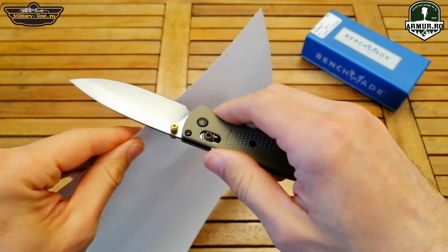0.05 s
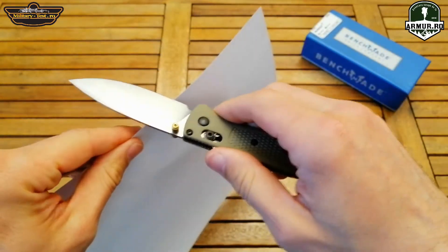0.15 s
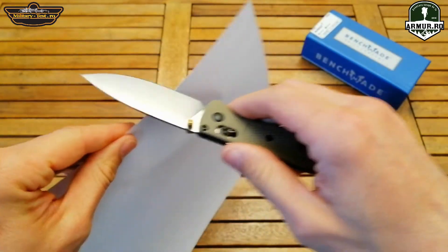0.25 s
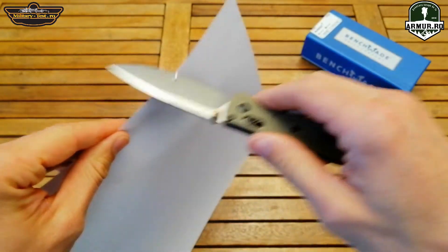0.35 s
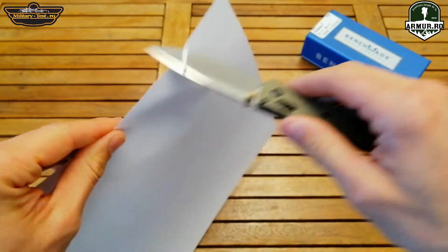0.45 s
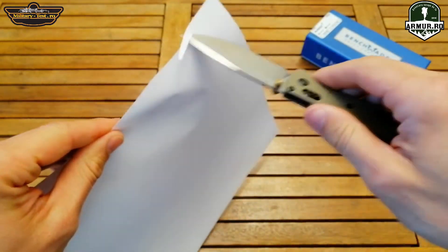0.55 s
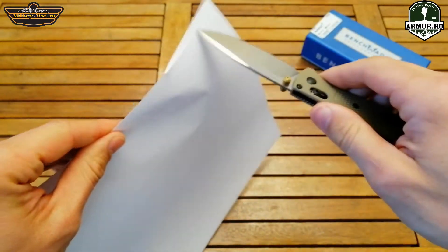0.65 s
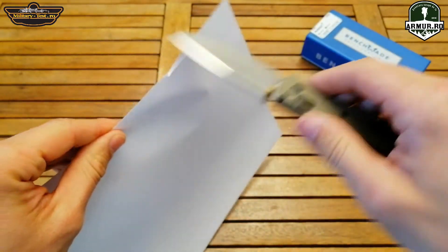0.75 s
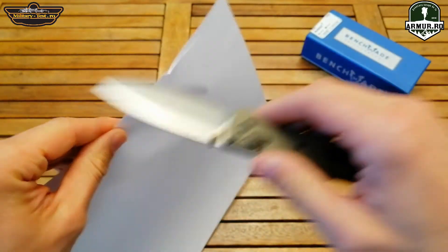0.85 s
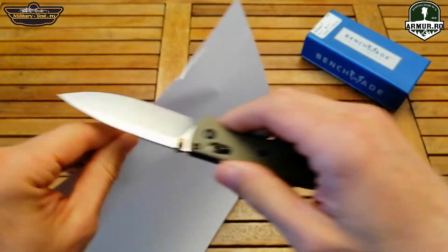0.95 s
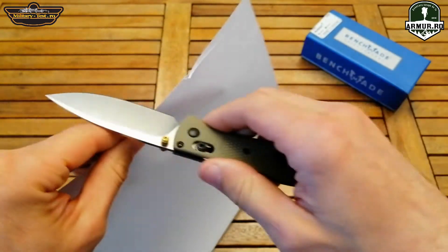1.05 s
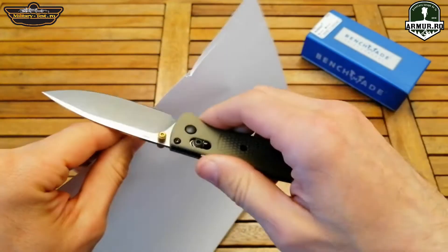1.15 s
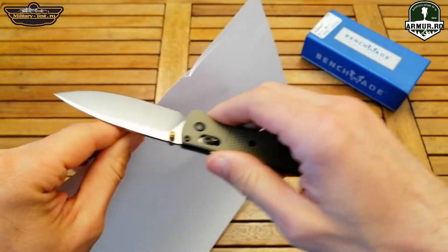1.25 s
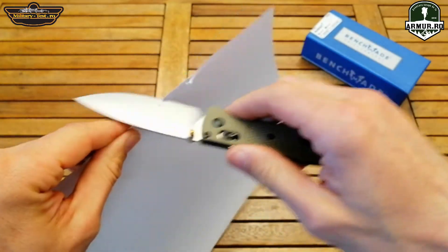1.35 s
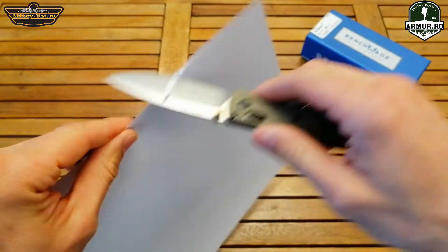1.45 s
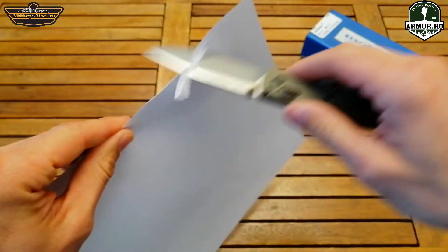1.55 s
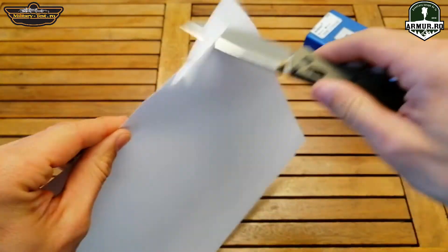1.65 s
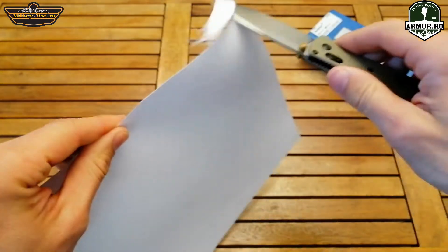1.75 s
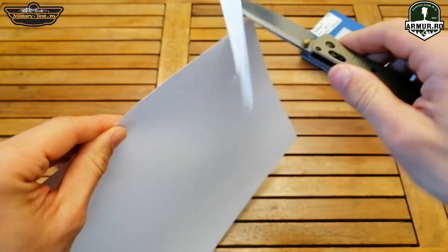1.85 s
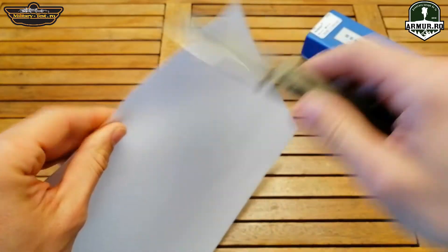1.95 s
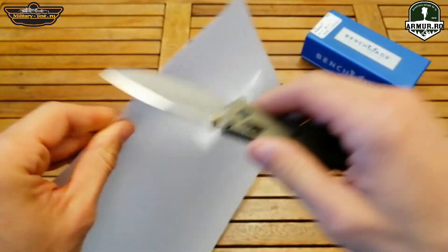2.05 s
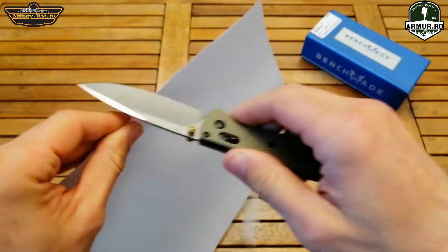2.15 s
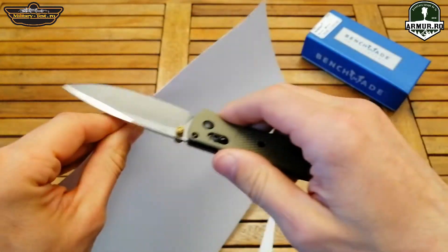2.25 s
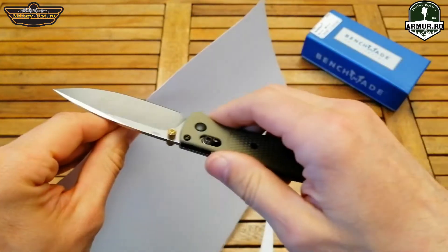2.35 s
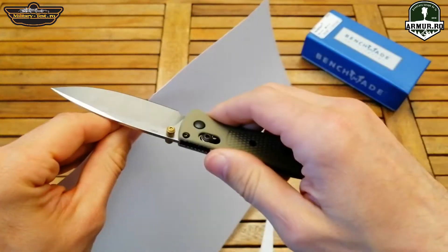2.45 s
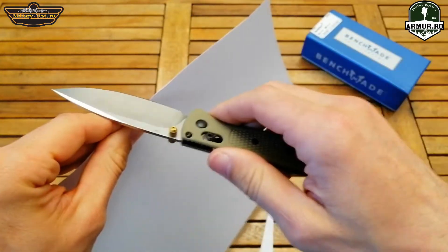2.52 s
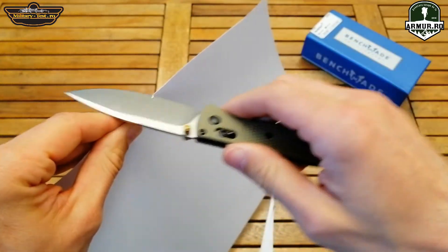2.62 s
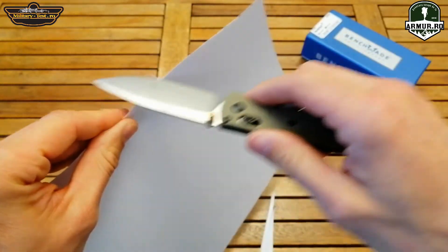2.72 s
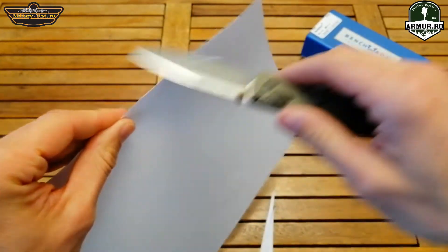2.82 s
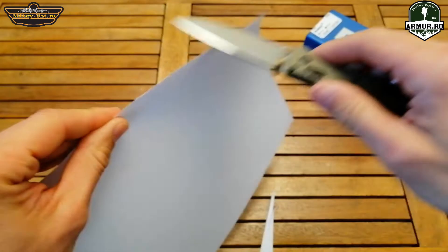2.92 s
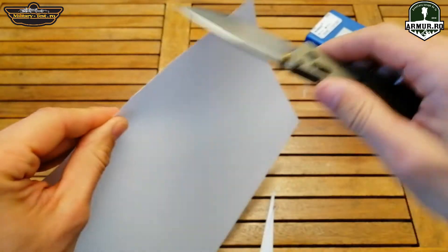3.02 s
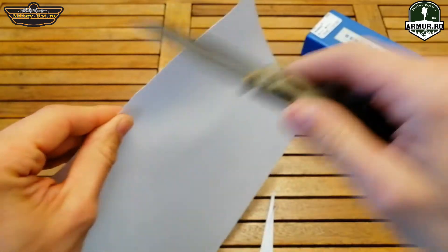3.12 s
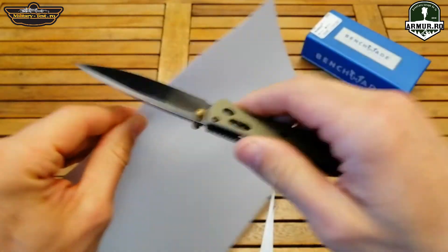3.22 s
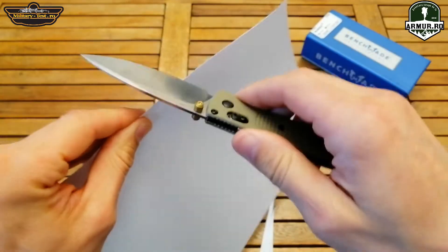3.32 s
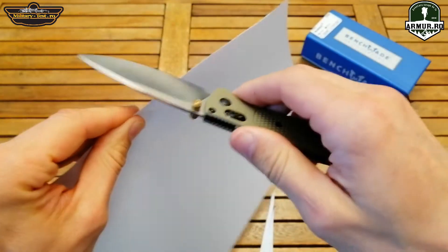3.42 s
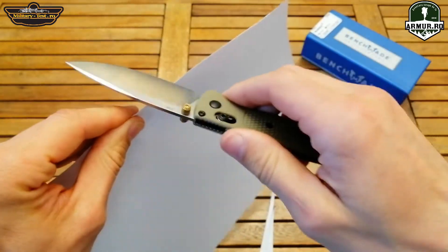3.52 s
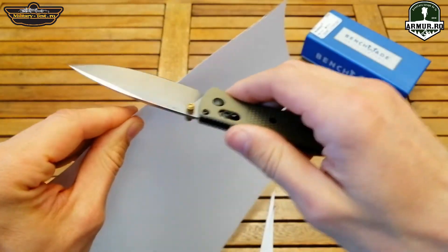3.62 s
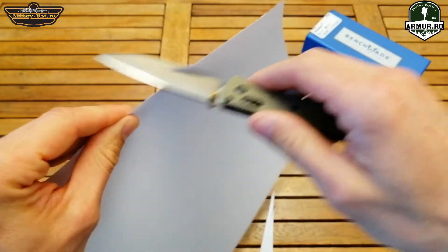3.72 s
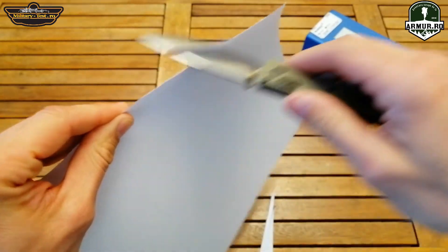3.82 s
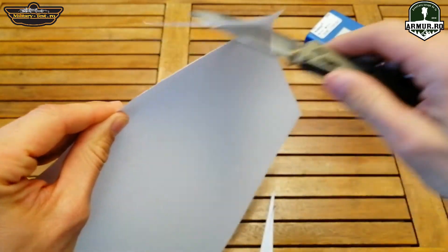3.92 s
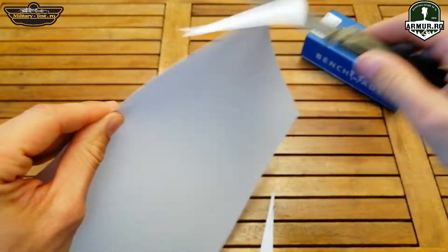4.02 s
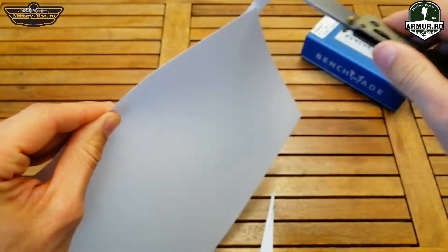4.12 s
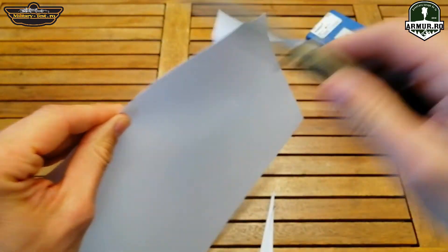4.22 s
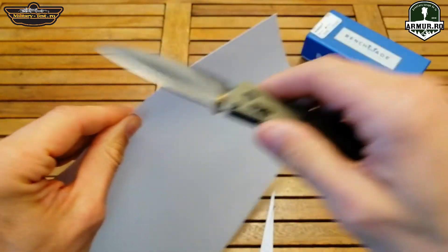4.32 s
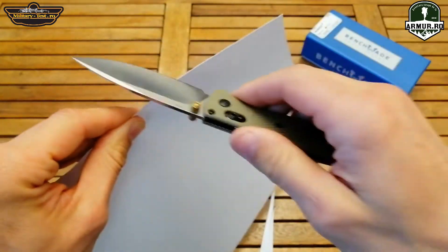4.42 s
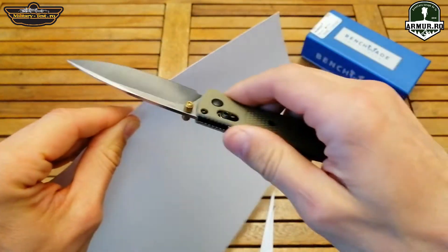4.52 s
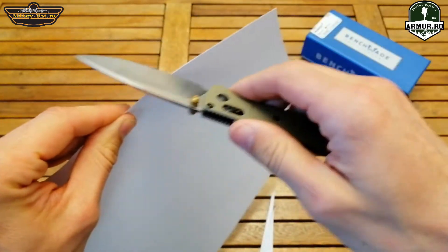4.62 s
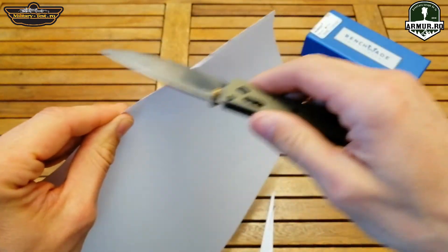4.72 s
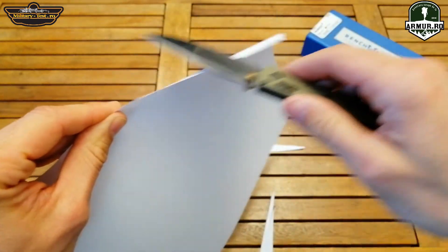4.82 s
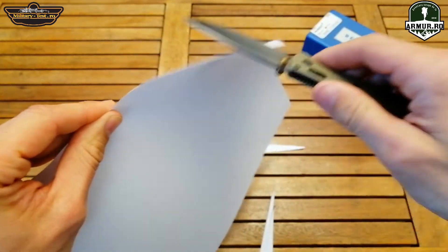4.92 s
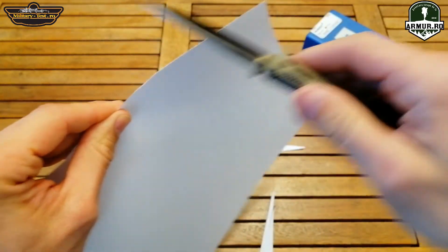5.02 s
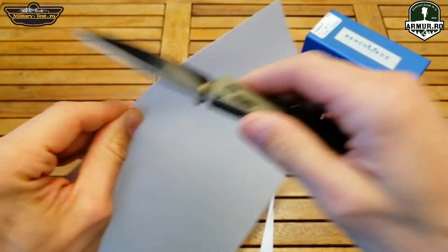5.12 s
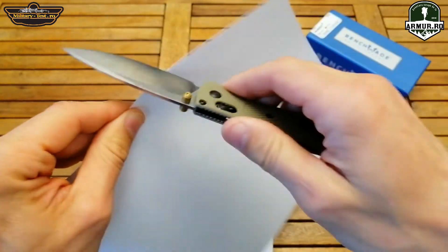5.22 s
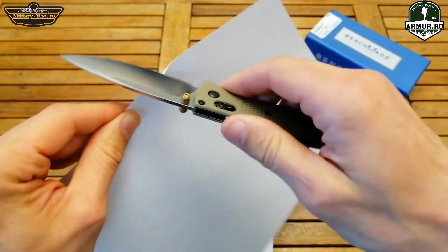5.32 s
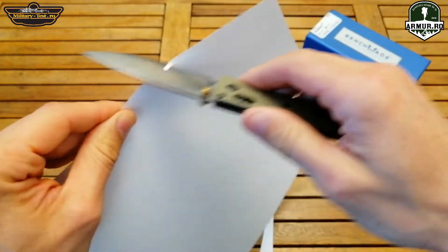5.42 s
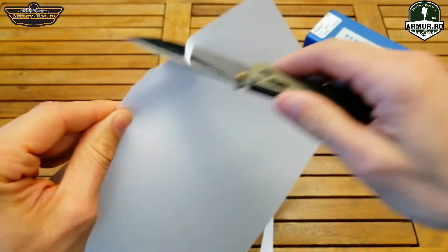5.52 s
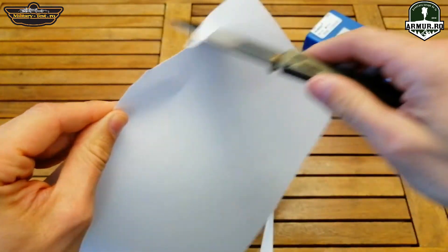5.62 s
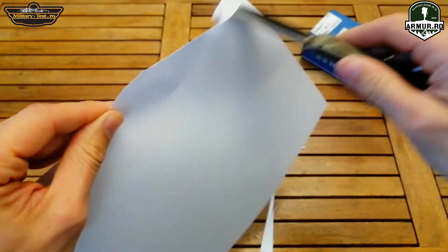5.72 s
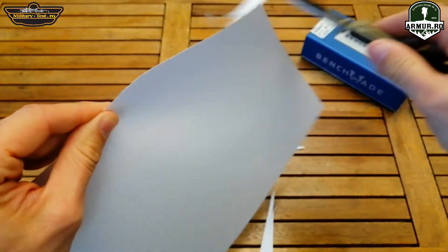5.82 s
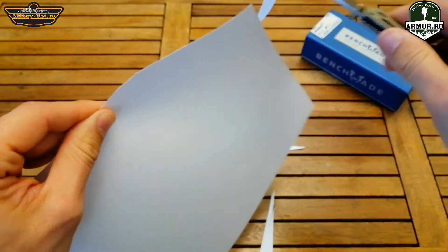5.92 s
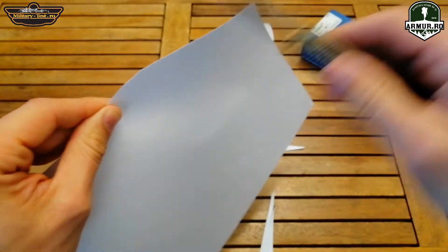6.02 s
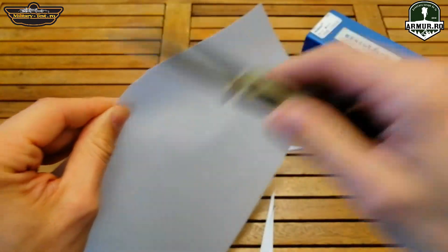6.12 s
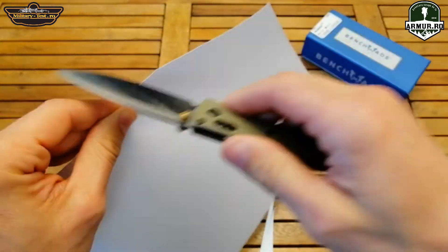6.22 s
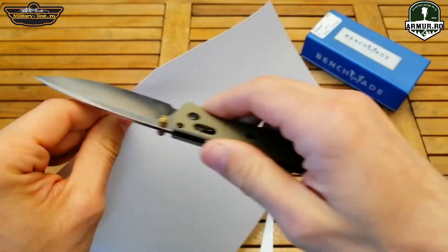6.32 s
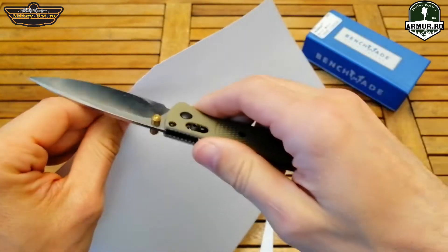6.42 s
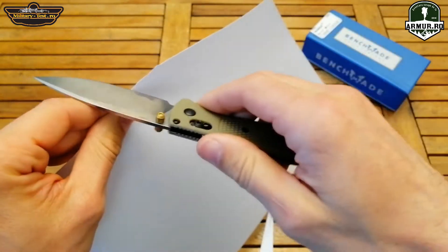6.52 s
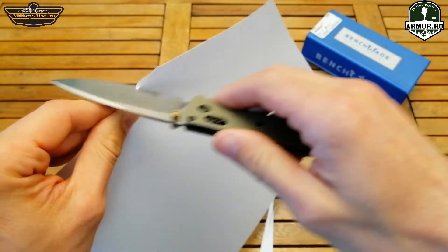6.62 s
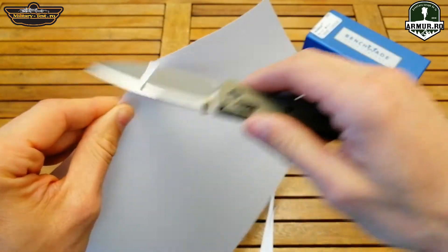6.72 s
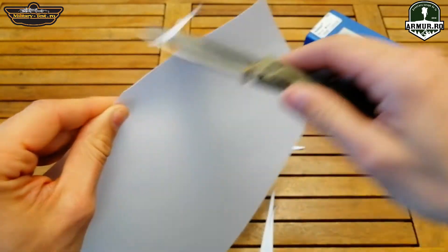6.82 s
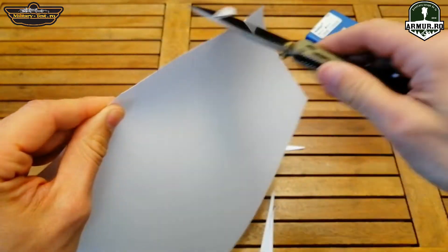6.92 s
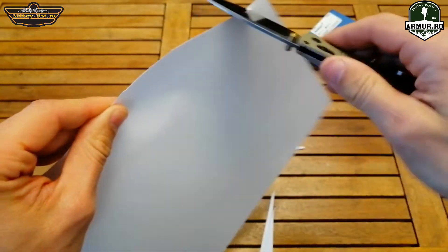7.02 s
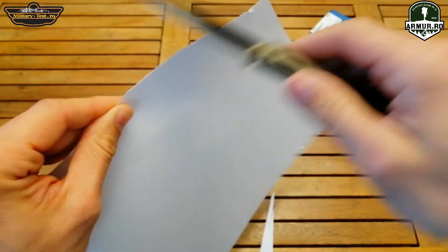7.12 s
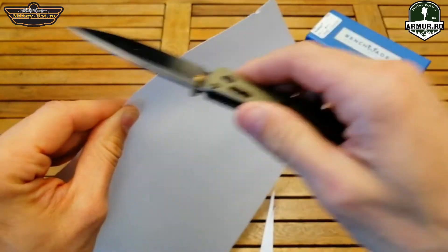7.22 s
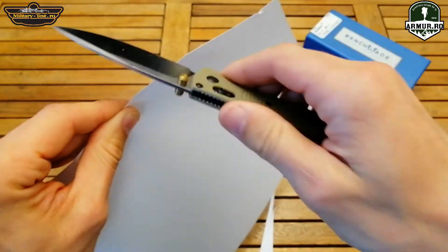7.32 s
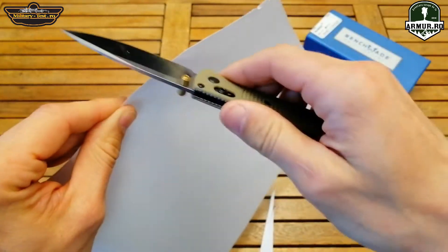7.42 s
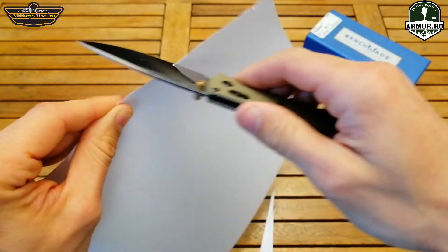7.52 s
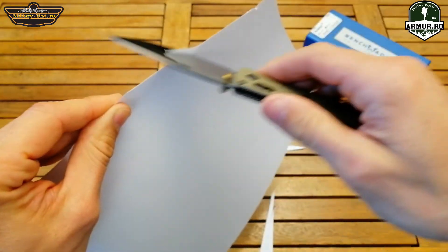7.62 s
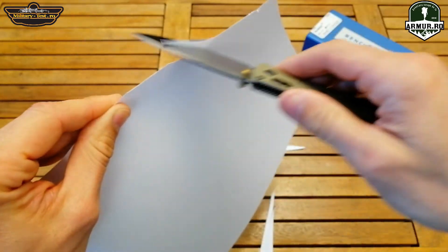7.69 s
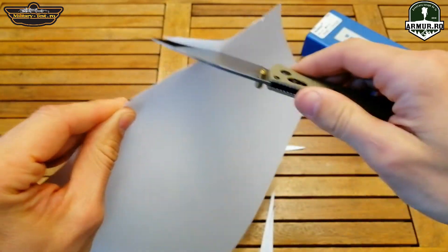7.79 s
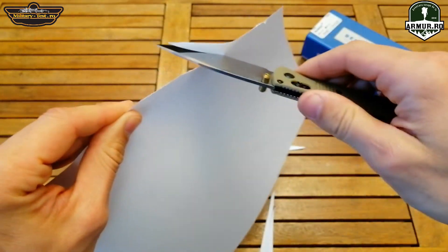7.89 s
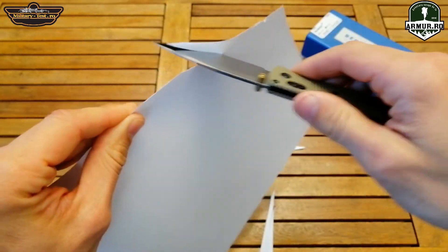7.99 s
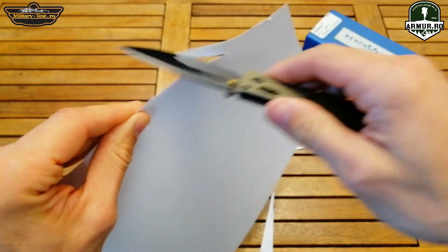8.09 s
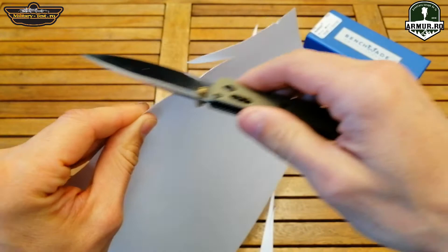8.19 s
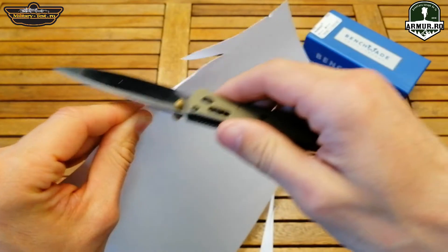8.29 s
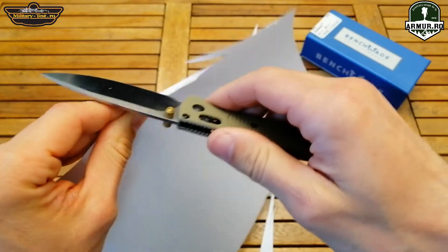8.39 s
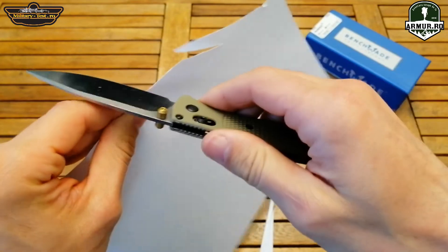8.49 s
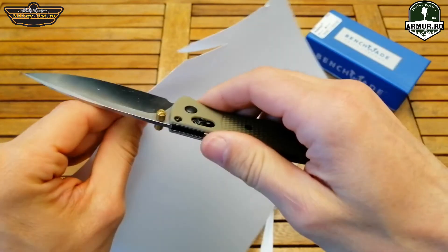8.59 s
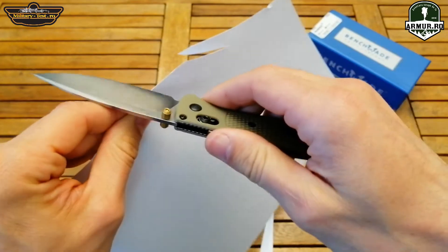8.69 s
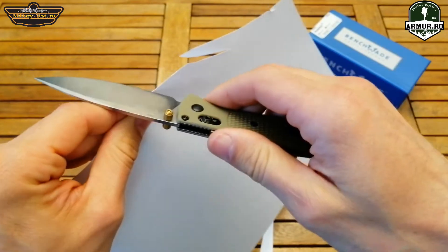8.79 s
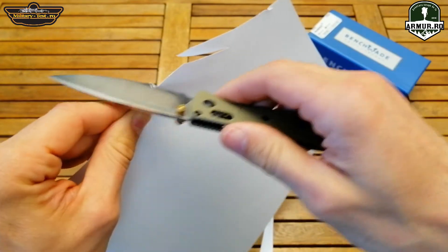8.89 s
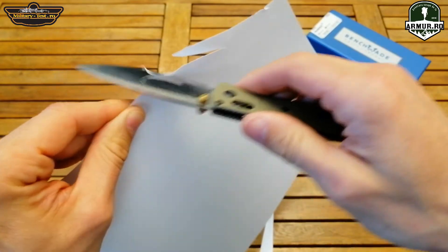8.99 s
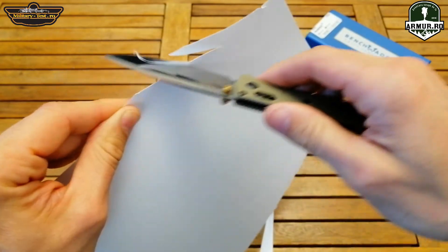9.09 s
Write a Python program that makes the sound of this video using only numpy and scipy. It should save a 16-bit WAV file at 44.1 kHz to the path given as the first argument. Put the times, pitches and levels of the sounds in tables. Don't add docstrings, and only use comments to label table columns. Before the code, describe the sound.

A sharp blade slices a hand-held paper sheet in short crisp rasping strokes, with ticks and soft flaps between, close up in a quiet small room.

```python
import sys
import numpy as np
from scipy import signal
from scipy.fft import rfft, irfft, next_fast_len
from scipy.io import wavfile
from scipy.ndimage import uniform_filter1d, map_coordinates

SR = 44100
rng = np.random.default_rng(int(sys.argv[2]) if len(sys.argv) > 2 else 0)


def inscribe(sig):
    pcm = np.round(np.clip(np.atleast_2d(sig).T, -1, 1) * 32767)
    wavfile.write(sys.argv[1], SR, pcm.astype(np.int16))


def volts(x):
    e = np.asarray(x, float) / 20
    return 10 ** e


N = 403515
HZ = np.fft.rfftfreq(next_fast_len(N), 1 / SR)
# [f/Hz, share 0-1]
SHEET_LIKENESS = [(100, 0.98), (700, 0.97), (1500, 0.85), (2500, 0.69), (3100, 0.44), (3700, 0.21),
                  (6000, 0.31), (12000, 0.31)]


def strokes():
    # [t/s, f/Hz]
    song_hz = [(0.3, 6140), (0.72, 6580), (1.21, 5910), (1.38, 6950), (1.73, 5830), (1.9, 6700),
               (2.37, 5570), (2.42, 6110), (4.56, 6540), (4.86, 5620), (4.93, 6610), (6.19, 6530),
               (6.26, 6960), (6.86, 5730), (6.93, 6860), (7.77, 6320), (8.65, 6920), (9.15, 5760)]
    # [pressure/(dB/dB), keenness/(dB/dB), slack/(dB/dB), offset/dB]
    body_law = (0.99, 0.011, 0.87, 0.11)
    mid_law = (0.99, 0.13, 0.23, -2.24)
    hiss_law = (1.036, 0.66, 0.022, 0.6)
    song_law = (1.12, -0.56, 0.13, -5)
    fizz_law = (1.014, 1.45, 0.022, 0.088)
    top_law = (1.22, 1.23, -0.27, -4)
    song_width_hz, song_left_db = 620, -18.5
    shrink_db_per_s = -0.3266
    t = np.arange(N) / SR

    snaps = mottled(fibres(30000, 1.0), 2.4, hz_bins=3, frames=10)
    snaps = mottled(snaps, 1.1, hz_bins=9, frames=16)
    snaps -= 0.24 * resonate(snaps, 3630 + 94 * t, 440)
    snaps += 1.9 * volts(-0.62 * t) * resonate(snaps, 4805 + 86 * t, 420)

    body, mid, hiss, fizz, top = sheet_bands(paired(*snaps, SHEET_LIKENESS))
    song = resonate(hiss, np.interp(t, *np.transpose(song_hz)), song_width_hz)
    song = evened(song * volts(np.array([[song_left_db], [0]])))
    mid = mid * volts(shrink_db_per_s * t)

    bands = (body, mid, hiss, song, fizz, top)
    laws = (body_law, mid_law, hiss_law, song_law, fizz_law, top_law)
    blade = contacts()
    out = np.zeros((2, N))
    for band, (*shares, offset_db) in zip(bands, laws):
        out += band * envelope(blade, lambda r: r[:, 1:] @ shares + offset_db)
    judder = evened(uniform_filter1d(rng.standard_normal(N), size=300))
    return out * volts(0.45 * judder)


def contacts():
    # [t/s, edge pressure/dB, bite keenness/dB, sheet slack/dB]
    slices = [
        [(0.3, -61, -11, 8), (0.32, -49.5, -4.5, -4), (0.46, -37, -2.5, -8), (0.572, -40, 2, -11),
         (0.716, -39, -3, -10), (0.74, -47.5, -8, -14)],
        [(1.4, -64, -15, 14), (1.415, -48, -8.5, -17), (1.442, -46.5, -3.5, -23), (1.458, -44.5, -4.5, 0),
         (1.53, -41.5, -7.5, -15), (1.596, -37, -2.5, -13.5), (1.69, -31.5, -7.5, -18.5),
         (1.772, -29.5, -14.5, -18.5), (1.83, -30.5, -12, -15.5), (1.893, -35, -7, -16.5)],
        [(3.695, -74.5, 1, 11), (3.738, -64.5, 2, -4), (3.75, -53.5, 0.5, 0.5), (3.867, -35.5, -2.5, -9),
         (3.969, -29.5, -12, -18), (4.025, -30.5, -8.5, -10.5), (4.117, -29, -11, -10)],
        [(5.5, -57, 6.5, -11), (5.517, -41.5, -3.5, 1.5), (5.635, -42.5, 5.5, -12.5), (5.681, -39, -0.5, -3),
         (5.75, -39, -3, -9), (5.795, -32, -11, -13.5), (5.86, -34, -8, -13), (5.912, -35, -2, -8.5)],
        [(7.61, -54.5, 2.5, -6), (7.638, -46, -4.5, -2), (7.656, -42.5, 0.5, -1.5), (7.698, -38, 0, -8),
         (7.75, -33.5, -8, -12.5), (7.82, -33.5, -10, -12), (7.889, -33, -7.5, -7)],
    ]
    # [t/s, pressure/dB, keenness/dB, slack/dB]
    nicks = [
        [(2.68, -77, 2, 0), (2.72, -54.5, -1.5, -4.5), (2.794, -45, -3.5, -2), (2.924, -40, -5.5, -11.5),
         (2.972, -35, -9, -19)],
        [(2.98, -52, -9, -1), (3.016, -55.5, -6.5, -1.5), (3.076, -48, -15, -5), (3.092, -51, -6, -4),
         (3.1, -38.5, -13, -6), (3.125, -39.5, -9.5, -7), (3.15, -53, -6, -5)],
        [(4.79, -75.5, -4, 18), (4.83, -54.5, 1, 3), (4.876, -45, -2.5, 2.5), (5.012, -48, -13, -14.5),
         (5.11, -57.5, -4, -13.5)],
        [(6.73, -62, -6.5, 2), (6.751, -43.5, -6, -6.5), (6.807, -42.5, 1, -9.5), (6.917, -39.5, 1.5, -10),
         (6.94, -38.5, -9.5, -16)],
        [(6.945, -47.5, -9, -6), (6.997, -54.5, -0.5, 10.5), (7.031, -32.5, -19, -12.5),
         (7.06, -34.5, -12, -2.5), (7.087, -32.5, -10.5, -10), (7.12, -38.5, -6.5, -14)],
        [(8.96, -63, -5.5, 1), (8.972, -58, -3.5, 4), (9.03, -42.5, -5.5, -7.5), (9.118, -40, -2.5, -3.5),
         (9.15, -37, -4, -18)],
    ]
    # [t/s, pressure/dB, keenness/dB, slack/dB]
    drag = [
        (8.145, -69, -3, -1),
        (8.172, -48.5, -7.5, -12.5),
        (8.19, -61, -7.5, -37),
        (8.336, -65, 0, -41),
        (8.402, -57, -7, -4.5),
        (8.45, -56, -5, -10),
        (8.51, -59.5, -4, -5.5),
        (8.562, -72, -1, 0),
    ]
    # [start/s, rise/s, fall/s, pressure/dB, slack/dB]
    brushes = [
        (0.119, 0.14, 0.022, -69.5, 5.5),
        (0.742, 0.021, 0.081, -48.5, -7.5),
        (0.825, 0.022, 0.03, -53, -32),
        (2.343, .003, 0.095, -55, -8),
        (5.43, 0.0027, 0.076, -54.5, -1),
        (5.918, 0.0027, 0.04, -43, 3.5),
        (5.99, 0.066, 0.052, -59.5, -16),
        (6.68, 0.011, 0.25, -56.5, -13),
        (8.562, 0.021, 0.066, -55.5, -5.5),
        (8.829, 0.05, 0.026, -55, 0.5),
    ]
    from_db, to_db, keen_db = -8.5, -26, -5
    rubs = []
    for s, rise_s, fall_s, db, slack in brushes:
        rubs.append([(s, db + from_db, keen_db, slack),
                     (s + rise_s, db, keen_db, slack),
                     (s + rise_s + fall_s, db + to_db, keen_db, slack)])
    cuts = [list(map(tuple, rows)) for rows in slices + nicks + [drag]]
    return sorted(cuts + rubs)


def fibres(per_s, spread_db):
    size_db = spread_db * np.minimum(rng.exponential(1, (2, N)), 4)
    size = volts(size_db) * rng.standard_normal((2, N))
    return size * (rng.random((2, N)) < per_s / SR)


def mottled(x, patchy_db, hz_bins, frames):
    z = signal.stft(x, nperseg=512)[2]
    patches = rng.standard_normal(z.T.shape).T
    patches = uniform_filter1d(uniform_filter1d(patches, hz_bins, 1), frames, 2)
    gain = volts(patchy_db * patches / patches.std())
    return signal.istft(z * gain, nperseg=512)[1][:, :N]


def sheet_bands(z):
    edges_hz = [490, 2200, 4400, 7600, 11000, 16000]
    # [f/Hz, density/dB]
    sheet_db = [(47, -50), (80, -27.5), (162, -5), (337, -9.5), (763, -5), (1240, -7), (1420, -9.5),
                (2470, -9), (3080, -9), (3750, -13.5), (6240, -12.5), (8510, -7.5), (12700, -17),
                (14800, -10.5), (15800, -32.5)]
    # [f/Hz, width/Hz, level/dB]
    rings = [(2800, 540, 2), (5340, 420, 5), (5950, 500, 3), (6990, 720, 6.5), (8250, 310, 4),
             (9970, 330, 5), (3930, 2900, -2.5), (2392, 520, -4)]
    # [f/Hz, left minus right/dB]
    ports_db = [(150, -2), (500, 4.5), (800, 2), (1300, -7.5), (1750, -7.5), (2400, 3.5), (3400, -1.5),
                (4500, -1.5), (5300, -2), (6000, -3.5), (6900, -1), (7600, -0.5), (8600, 13), (9700, 5),
                (11500, 0), (15000, -2.5)]
    db = read(sheet_db, HZ)
    for hz, width_hz, ring_db in rings:
        db = db + ring_db * np.exp(-2 * ((HZ - hz) / width_hz) ** 2)
    db = db + np.array([[0.5], [-0.5]]) * read(ports_db, HZ)
    slopes = (7, 16, 24, 24, 16, 24)
    above = [1 / (1 + (hz / (HZ + 1)) ** steep) for hz, steep in zip(edges_hz, slopes)]
    return [heard(z * np.sqrt(abs(lo - hi)), db) for lo, hi in zip(above, above[1:])]


def ticks():
    # [t/s, peak/dB, body/dB rel, mid/dB rel, echo/dB rel]
    hard = [(1.2223, -24.5, 0.5, -2.5, -7.5), (2.114, -33.5, -8, -12.5, -10.5), (2.3374, -26, -9, -10, -24),
            (2.8936, -36.5, 2, -1, -13), (3.063, -28.5, -20, -20, -14), (5.3853, -53.5, 13.5, -2.5, -13.5),
            (3.1004, -24.5, -21, -7, -24), (4.5095, -31.5, -22, -10, -1.5), (5.5143, -46, 6, 14, -1),
            (5.9203, -33.5, 6.5, -5, -6), (5.9389, -31.5, 1, 5, -4), (7.0435, -18, -34.5, -16, -15),
            (7.625, -46, -4, -26.5, -3)]
    # [t/s, peak/dB, body/dB rel, mid/dB rel, echo/dB rel]
    touches = [(0.2493, -55.5, -6, -9, 2.5), (0.308, -37.5, -14, 1.5, -3), (1.149, -59.5, -0.5, 4.5, 5),
               (1.407, -47, -14, -23, -7), (2.3225, -58, 9, -10, -11), (2.79, -36, -7, -10, -15),
               (3.0725, -46, -20, -20, -10), (3.0875, -36, -18, -20, -12), (4.98, -35.5, -8, -2, -13),
               (4.993, -39, -12, -5, -14), (8.172, -38.5, -11.5, -19, -6), (8.403, -52, -8, 5, -11),
               (8.446, -48, -7, 5, -4), (2.208, -57.5, -12, -3, 3), (2.310, -52, -16, -5, 11),
               (2.526, -73, 17, -2, -22), (2.39, -42, -4.5, -12, -7), (3.2892, -63, -16.5, 5, 1),
               (3.351, -58.5, 4, 6, 2), (3.695, -55.5, 14.5, -21, -9), (3.7463, -53, -15, -20, -4.5),
               (4.4664, -46, -7.5, -2, -8), (4.578, -53, -10, 6, -19), (5.253, -50, -3, 3, -4),
               (5.4341, -48, -17.5, -20, 2), (6.2902, -43, -11, -16, 7.5), (6.6217, -49, -19, -5, 5.5),
               (7.609, -51, 4, -16, -5), (8.082, -56, -10, -18.5, -5), (8.964, -63, -13, -16, -1.5)]
    # [t/s, peak/dB, body/dB rel, mid/dB rel, echo/dB rel]
    pricks = [
        (2.0496, -56.5, -16, 1, -4),
        (2.0693, -56.5, -20, -15, -3),
        (2.2215, -69, -14, -6, -5),
        (8.581, -48, -9.5, 1, 0.5),
    ]
    crackle = rng.standard_normal(N)
    crack_at = np.round((np.array(hard)[:, 0] + 0.0006) * SR).astype(int)
    crackle[crack_at] = 2.7
    likeness = [(1500, 1.0), (2500, 0.74)]  # f/Hz, share
    bands = np.array(sheet_bands(paired(crackle, np.roll(crackle, 5000), likeness)))

    t = np.arange(1500) / SR
    t60_s = np.array([0.014, 0.012, 0.013, 0.011, 0.010])[:, None, None]
    prick_times = np.array(pricks)[:, 0]
    out = np.zeros((2, 2, N))
    for s, db, body_db, mid_db, echo_db in hard + touches + pricks:
        fizz_db = min(-39.5 - 0.64 * db, -11)
        if s in prick_times:
            fizz_db = 5.5
        band_db = np.array([body_db, mid_db, 0, fizz_db, fizz_db - 9])
        scuff = np.clip((-22 - db) / 12, 1, 2.6)
        for mix, extra_db, slow in zip(out, (0, echo_db), (scuff, 0.35)):
            fall = volts(-60 * t / (t60_s * slow)) * np.minimum(t / (0.00055 * slow), 1)
            start = round(s * SR)
            burst = bands[:, :, start:start + len(t)] * fall
            burst /= abs(burst.mean(1)).max(1)[:, None, None]
            add(mix, s, np.tensordot(volts(db + extra_db + band_db), burst, 1))
    return signal.sosfilt(signal.butter(2, 330, "high", fs=SR, output="sos"), out)


def skids():
    return glides([
        (3.215, .025, 1500, 1500, -62),
        (7.158, .02, 4200, 1500, -54),
        (8.255, 0.026, 6100, 6600, -56),
        (8.285, 0.024, 6800, 5200, -57),
    ])


def pops():
    # [t/s, peak/dB, f/Hz, t60/s]
    creases = [(2.015, -50, 746, 0.016), (2.112, -50, 700, .012), (2.133, -47, 500, .015),
               (2.311, -53, 800, 0.011), (2.3225, -43, 690, 0.0085), (2.336, -38.5, 1080, 0.025),
               (2.506, -54, 910, .012), (2.523, -42, 630, 0.016), (3.114, -35, 1250, .015),
               (5.125, -50, 497, 0.018), (5.226, -45.5, 900, .012), (5.255, -48, 805, 0.017),
               (5.3866, -30.5, 700, .007), (5.405, -40, 496, 0.011), (7.6105, -31, 654, 0.011),
               (7.6235, -30.5, 676, 0.014), (8.405, -53, 600, .015)]
    out = np.zeros((2, N))
    t = np.arange(1200) / SR
    for s, db, hz, t60_s in creases:
        fall = volts(db - 60 * t / t60_s + np.array([[1.5], [-1.5]]))
        add(out, s, 2 * fall * np.sin(2 * np.pi * hz * t) * np.minimum(t / 0.0007, 1))
    return out


def flaps():
    # [start/s, rise/s, hold/s, fall/s, level/dB]
    buckles = [(1.7, .06, .04, .06, -54), (1.86, .016, .005, 0.11, -49.5), (2.0, 0.019, .002, 0.033, -55),
               (2.11, 0.0053, 0.03, 0.036, -53.5), (2.305, 0.0089, 0.035, 0.036, -55.5),
               (2.505, 0.0054, 0.039, 0.03, -60.5), (4.1, .003, .005, 0.038, -61),
               (4.15, 0.023, 0.0018, 0.056, -49.5), (4.81, .02, .06, 0.065, -57),
               (5.11, 0.013, 0.12, 0.12, -53.5), (5.388, 0.0011, 0.0087, 0.067, -44.5),
               (5.512, .006, .022, .03, -50.5), (5.9, 0.026, 0.023, 0.07, -41.5),
               (5.98, .01, 0.062, .03, -60), (6.61, 0.012, 0.0018, 0.078, -52.5),
               (7.28, 0.01, 0.066, 0.054, -65), (7.61, 0.0011, 0.0017, 0.06, -43.5),
               (7.645, 0.012, 0.0098, 0.023, -46.5), (8.38, 0.025, 0.033, 0.063, -62)]
    # [start/s, rise/s, hold/s, fall/s, level/dB]
    sags = [(0.0, 0.0027, .01, 0.18, -62), (0.3, 0.09, 0.2, 0.24, -54.5), (1.43, 0.038, 0.0093, 0.16, -54),
            (1.66, 0.22, .01, 0.066, -51.5), (2.8, 0.083, 0.2, 0.31, -57), (4.06, 0.056, .01, 0.075, -54),
            (5.11, 0.013, 0.12, 0.062, -65.5), (5.34, 0.11, 0.011, 0.053, -66),
            (5.53, 0.21, 0.049, .025, -64), (5.79, 0.077, .01, 0.32, -57.5),
            (6.74, 0.0053, 0.038, 0.24, -58.5), (6.93, .13, 0.018, 0.068, -52),
            (7.28, 0.054, 0.026, 0.16, -62.5), (7.59, .02, 0.016, 0.46, -60)]
    # [f/Hz, density/dB]
    buckle_db = [(88, -32.5), (150, -4), (775, 4), (1280, -8.5), (1730, -15), (2310, -31), (3000, -20),
                 (3900, -67.5), (6600, -120)]
    # [f/Hz, density/dB]
    sag_db = [(40, -40.5), (90, -3.5), (160, 7.5), (300, 6), (520, -32)]
    z = paired(*fibres(4000, 1.5), SHEET_LIKENESS)
    lumps = heard(z, read(buckle_db, HZ) + np.array([[1.5], [-1.5]]))
    low = heard(z, read(sag_db, HZ))
    buckling = lumps * envelope(pushes(buckles), lambda r: r[:, 1])
    sagging = low * envelope(pushes(sags), lambda r: r[:, 1] - 1.5)
    return buckling + sagging


def pushes(rows):
    from_db, to_db = -25, -27.5
    out = []
    for s, rise_s, hold_s, fall_s, db in rows:
        full = s + rise_s
        release = full + hold_s
        out.append([(s, db + from_db), (full + 0.00034, db),
                    (release + 0.0043, db), (release + fall_s + 0.003, db + to_db)])
    return out


def sways():
    return glides([
        (.33, .33, 310, 100, -58),
        (.73, .07, 110, 75, -64),
        (1.78, .14, 260, 140, -58),
        (2.1, .1, 230, 160, -62),
        (5.1, .19, 115, 78, -61),
        (5.12, .14, 230, 200, -61),
        (5.66, .14, 380, 220, -61),
        (5.87, .12, 200, 130, -59),
    ])


def travel(x):
    # [t/s, f/Hz]
    null_hz = [(.33, 2400), (.62, 2850), (1.45, 2550), (1.66, 2450), (1.8, 1950), (2.7, 2950), (2.92, 2500),
               (3.75, 2250), (3.95, 2500), (4.9, 2500), (5.55, 2450), (5.7, 2550), (5.76, 2250),
               (5.9, 2450), (6.79, 2750), (6.93, 2250), (7.7, 2400), (8.3, 2500)]
    delay = SR / (2 * np.interp(np.arange(N) / SR, *np.transpose(null_hz)))
    return np.array([x[0], map_coordinates(x[1], [np.arange(N) - delay], order=3)])


def hollowed(x):
    # [start/s, end/s, from f/Hz, to f/Hz, 1 = in each port, 0 = only between them]
    hollows = [(.335, .405, 2500, 2300, 0), (.49, .54, 2700, 2750, 0), (.57, .635, 2750, 2850, 0),
               (.47, .63, 3900, 3750, 1), (1.61, 1.71, 2450, 2400, 0), (1.7, 1.78, 2050, 1900, 0),
               (1.79, 1.84, 3900, 3900, 1), (1.865, 1.9, 3700, 3700, 1), (2.69, 2.77, 2900, 3000, 0),
               (2.85, 2.91, 2500, 2600, 0), (3.745, 3.82, 2250, 2250, 0), (3.84, 3.92, 2400, 2500, 0),
               (5.53, 5.58, 2450, 2450, 0), (5.6, 5.72, 2450, 2550, 0), (5.54, 5.63, 3650, 3900, 1),
               (5.74, 5.79, 4250, 4300, 1), (6.78, 6.93, 2750, 2200, 0), (6.81, 6.88, 3800, 3600, 1),
               (7.69, 7.76, 4200, 4400, 1), (7.74, 7.78, 2250, 2250, 0), (7.79, 7.835, 2650, 2650, 0),
               (8.18, 8.46, 4250, 4350, 1), (8.29, 8.39, 3750, 3550, 1)]
    edge_s = 0.01
    out = x.copy()
    for start, end, from_hz, to_hz, each in hollows:
        part = out[:, round(start * SR):round(end * SR)]
        u = np.linspace(0, 1, part.shape[1])
        hz = from_hz + (to_hz - from_hz) * u
        width_hz = 330 if each else 450
        band = resonate(part if each else part.mean(0), hz, width_hz)
        band = resonate(band[..., ::-1], hz[::-1], width_hz)[..., ::-1]
        gate = np.clip(np.minimum(u, 1 - u) * (end - start) / edge_s, 0, 1)
        add(out, start, -gate * band)
    return out


def room(x, delay_s=0.008):
    # [f/Hz, t60/s]
    decay_s = [(200, 0.45), (1000, 0.39), (5000, 0.43), (9000, 0.31), (15000, 0.27)]
    taps = np.zeros((2, SR // 2))
    start = np.arange(round(delay_s * SR), SR // 2 - 20, 20)
    at = start + rng.integers(0, 20, (2, len(start)))
    np.put_along_axis(taps, at, rng.choice([-1.0, 1.0], at.shape), 1)
    hz, t, z = signal.stft(taps, SR, nperseg=256)
    t60_s = read(decay_s, hz)[:, None]
    z = z * volts(-60 * t / t60_s)
    z *= np.sqrt(t60_s) / np.linalg.norm(z, axis=2, keepdims=True)
    tail = signal.istft(z, SR, nperseg=256)[1]
    tail = tail / np.linalg.norm(tail[0])
    return signal.fftconvolve(x + 0.045 * x[::-1], tail, axes=1)[:, :N]


def hums():
    return glides([
        (0.0, .3, 215, 200, -70),
        (.13, .22, 152, 150, -68),
        (.86, .34, 235, 250, -72),
        (.95, .25, 55, 70, -69),
        (3.3, .35, 225, 225, -72),
        (4.58, .24, 50, 45, -68),
        (6.02, .56, 235, 225, -71),
        (7.3, .28, 220, 220, -71),
    ])


def air():
    # [f/Hz, density/dB]
    air_db = [(4, -0.5), (20, -3), (76, -7.5), (230, -12.5), (330, -17.5), (1850, -29), (2890, -29),
              (3820, -36), (5350, -32.5), (7910, -36.5), (14600, -37.5), (15900, -32)]
    # [f/Hz, share 0-1]
    likeness = [(30, 0.1), (150, 0.64), (500, 0.23), (1400, 0.047), (15000, 0.011)]
    z = paired(*mottled(rng.standard_normal((2, N)), 0.55, hz_bins=4, frames=12), likeness)
    hush = volts(-64.5) * heard(z, read(air_db, HZ))
    rumble = signal.sosfiltfilt(signal.butter(2, 300, fs=SR, output="sos"), hush)
    hop = SR // 8
    swell = evened(np.interp(np.arange(N), np.arange(0, N, hop), rng.standard_normal(N // hop + 1)))
    return hush + rumble * (volts(3.2 * swell - 2.5) - 1)


def glides(rows):
    fuzz_hz, fuzz_share = 22.07, 0.02
    out = np.zeros((2, N))
    for s, length_s, from_hz, to_hz, db in rows:
        u = np.linspace(0, 1, round(length_s * SR))
        hz = from_hz + (to_hz - from_hz) * u
        fuzz = resonate(rng.standard_normal(len(u)), hz, fuzz_hz + fuzz_share * from_hz)
        tone = evened(resonate(fuzz, hz, 3 * fuzz_hz + fuzz_share * from_hz))
        add(out, s, volts(db) * np.sin(np.pi * u) * tone)
    return out


def resonate(x, hz, width_hz):
    turn = np.exp(2j * np.pi * np.cumsum(hz) / SR)
    r = np.exp(-np.pi * width_hz / SR)
    return 2 * (turn * signal.lfilter([1 - r], [1, -r], x / turn)).real


def envelope(tables, db_of, edge_s=0.0036):
    out = np.zeros(N)
    for rows in map(np.array, tables):
        s = rows[:, 0]
        t = np.arange(s[0], s[-1] + edge_s, 1 / SR)
        gate = np.clip(np.minimum(t - s[0], s[-1] - t + edge_s) / edge_s, 0, 1)
        add(out, s[0], gate * volts(np.interp(t, s, db_of(rows))))
    return out


def paired(a, b, likeness):
    a, b = rfft([a, b], next_fast_len(N))
    c = np.clip(read(likeness, HZ), 0, 1)
    return np.array([c * a + np.sqrt(1 - c ** 2) * b, a])


def heard(z, db):
    return evened(irfft(z * volts(db), next_fast_len(N))[:, :N])


def evened(x):
    return x / np.sqrt(np.mean(np.mean(np.atleast_2d(x), 0) ** 2) + 1e-20)


def read(points, hz):
    f, value = np.transpose(points)
    return np.interp(np.log(hz + 1), np.log(f + 1), value)


def add(mix, s, sound):
    start = round(s * SR)
    part = mix[..., start:start + sound.shape[-1]]
    part += sound[..., :part.shape[-1]]


def scene():
    cut = travel(volts(1.0) * strokes() + flaps() + pops())
    snaps, to_walls = ticks()
    small = travel(snaps + skids() + sways() + hums())
    echo = room(volts(-11.5) * cut + to_walls)
    return hollowed(cut + small + echo) + air()


def roll_off(x):
    return signal.sosfilt(signal.butter(12, 16460, fs=SR, output="sos"), x)


def record(dry):
    lowpass = signal.firwin(255, 15650, window=("kaiser", 9), fs=SR)
    mix = signal.oaconvolve(dry, lowpass[None], "same", axes=1)
    return roll_off(mix)


dry = scene()
out = record(dry)
inscribe(out)
```